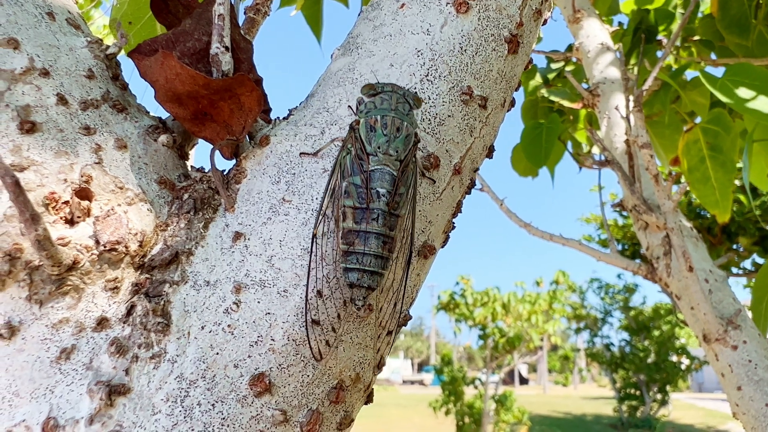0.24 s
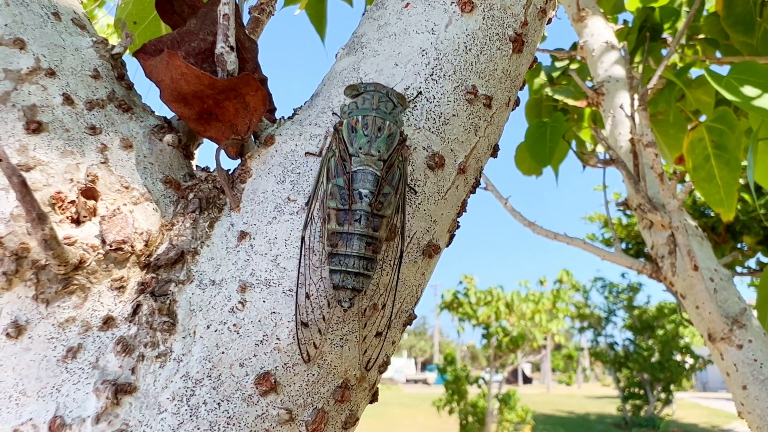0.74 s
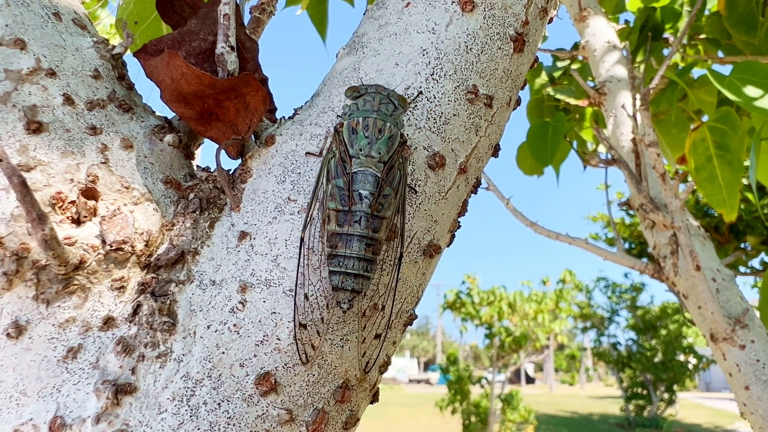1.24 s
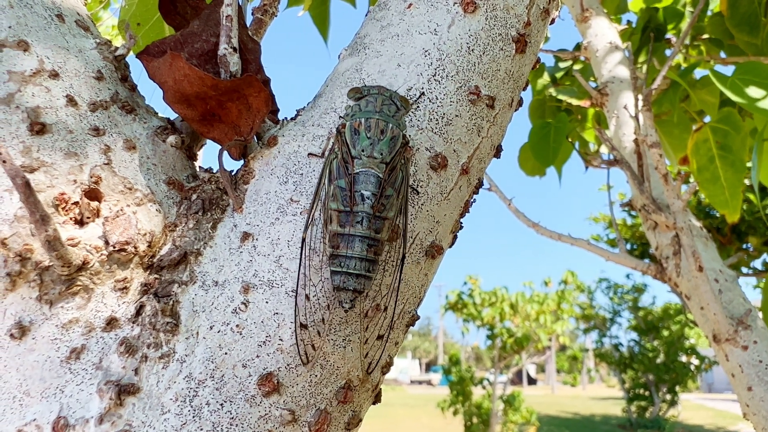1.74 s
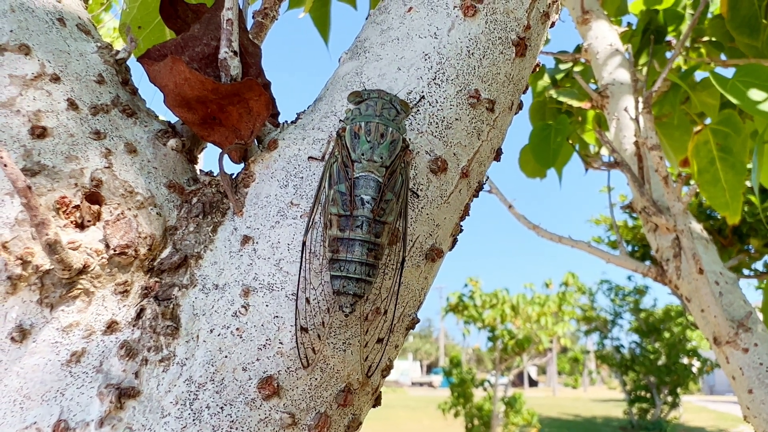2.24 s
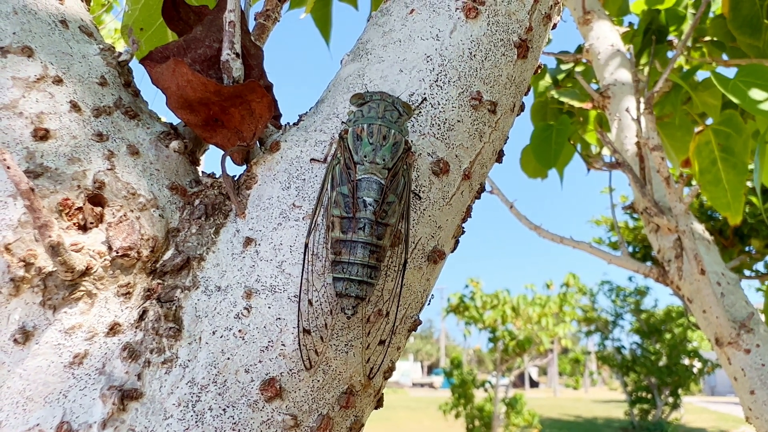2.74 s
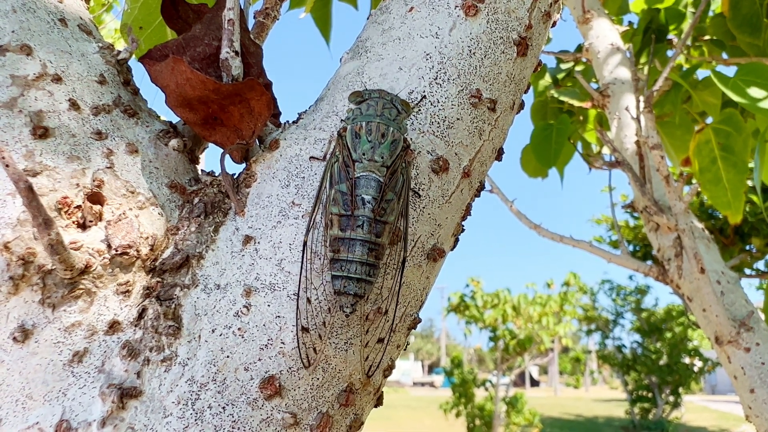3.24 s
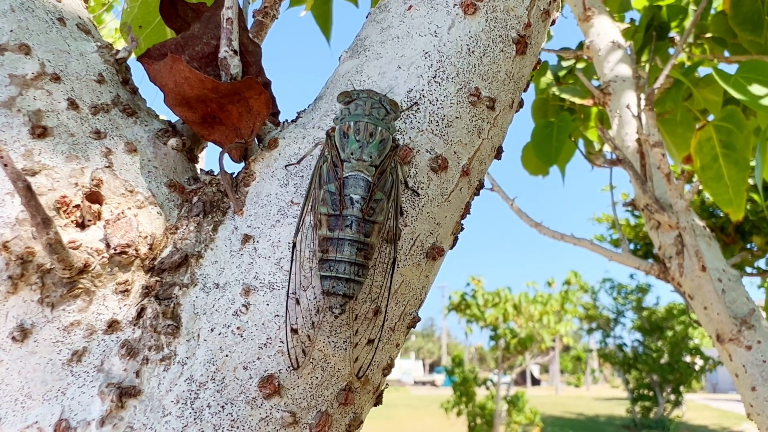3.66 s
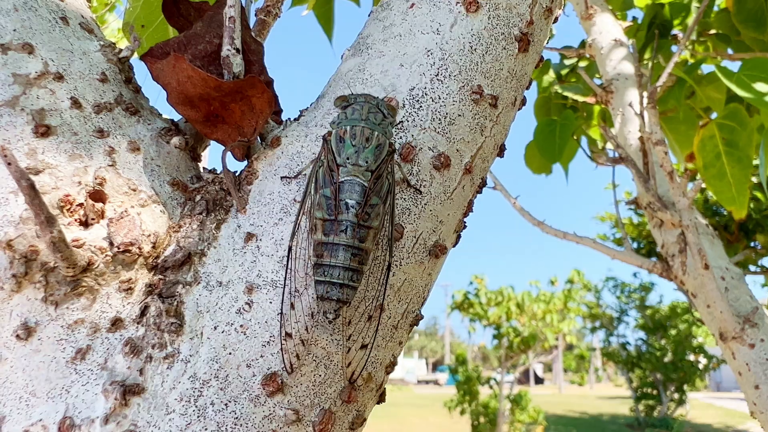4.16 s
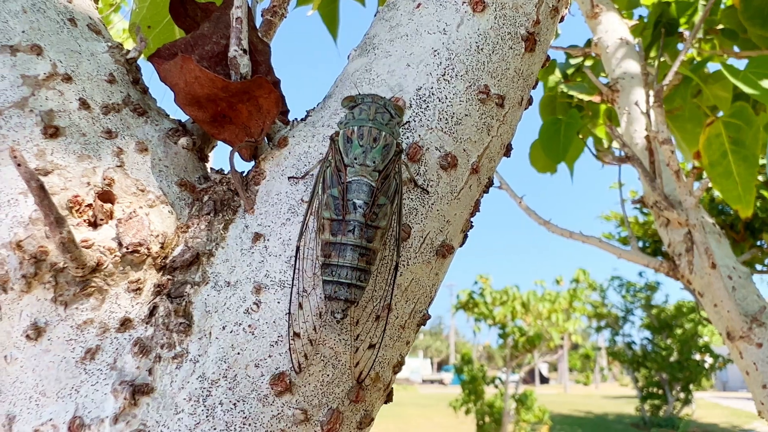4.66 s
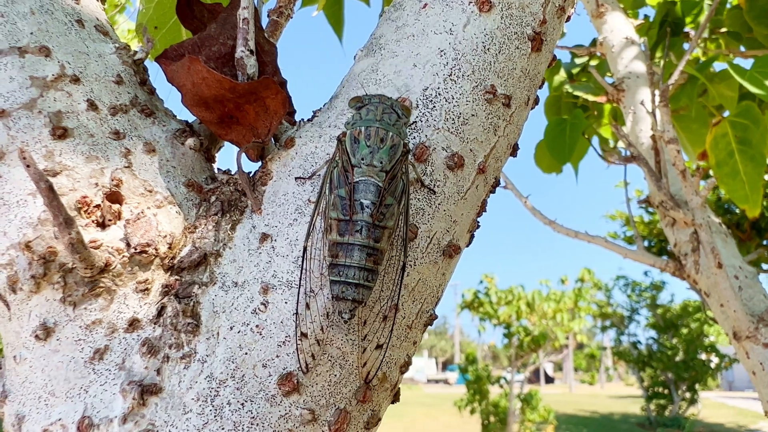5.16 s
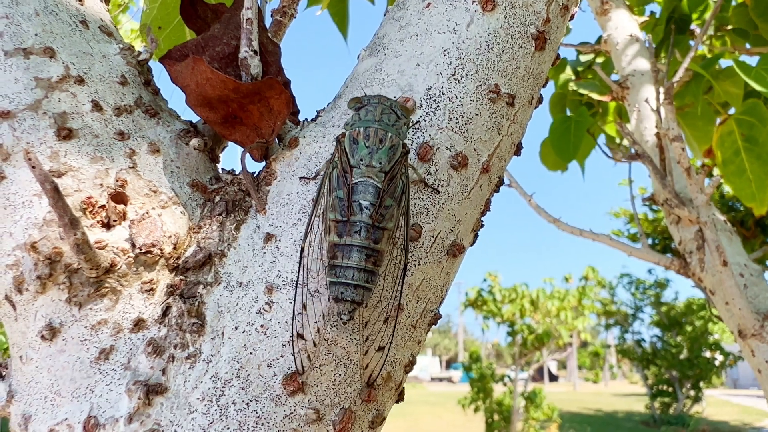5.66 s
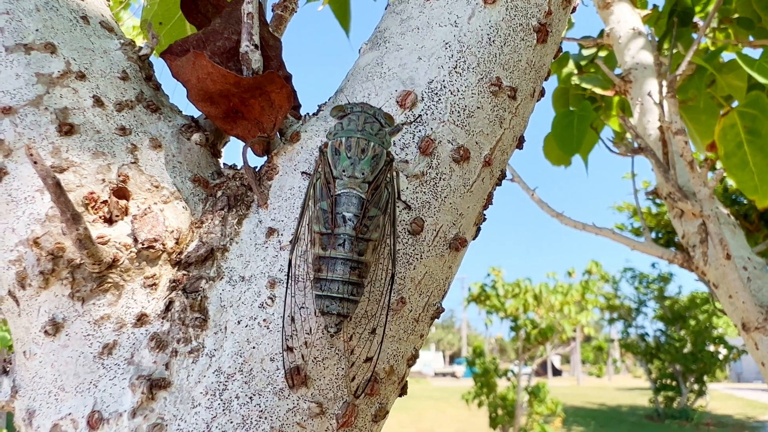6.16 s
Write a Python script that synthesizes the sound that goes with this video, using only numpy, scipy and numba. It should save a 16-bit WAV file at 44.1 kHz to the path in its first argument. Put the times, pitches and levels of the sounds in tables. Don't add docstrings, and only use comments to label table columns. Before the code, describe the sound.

A single cicada close by sings a loud, harsh, high rattling buzz in phrases, each ending in a swell and brief gap, in a quiet park.

```python
import sys
import numpy as np
from scipy import signal
from scipy.io import wavfile
from numba import njit

SR = 44100
rng = np.random.default_rng(int(sys.argv[2]) if len(sys.argv) > 2 else 0)


def ratio_of_db(decibels):
    return 10 ** (np.asarray(decibels, float) / 20)


def dump_mix(stems):
    frames = np.atleast_2d(stems).T
    limited = np.clip(frames, -1, 1)
    pcm = np.round(limited * 32767).astype(np.int16)
    wavfile.write(sys.argv[1], SR, pcm)


N = 283122


def rms_one(x):
    return x / np.sqrt(np.mean(x ** 2) + 1e-20)


@njit
def ring(x, r, turn):
    out = np.zeros(len(x))
    for i in range(2, len(x)):
        drive = (1 - r * r) / 2 * (x[i] - x[i - 2])
        out[i] = drive + 2 * r * np.cos(turn[i]) * out[i - 1] - r * r * out[i - 2]
    return out


def resonate(x, modes, tune=1):
    turn = 2 * np.pi / SR * tune * np.ones(N)
    x = x + np.cos(np.arange(N)) / 10 ** 12
    out = 0
    for k, (hz, width_hz, level_db) in enumerate(modes):
        out = out + (-1) ** k * ratio_of_db(level_db) * ring(x, np.exp(-np.pi * width_hz / SR), hz * turn)
    return rms_one(out)


# hz, db_per_hz
RUMBLE_SPECTRUM = [(20, -18), (60, -9.5), (120, -13.5), (250, -19), (450, -21.5), (700, -19), (1100, -26),
                   (1600, -52)]
# centre_s, half_width_s, level_db
RUMBLE_SWELLS = [
    (.3, 0.39, 3.5),
    (1.55, 0.11, 6),
    (2.048, 0.32, 7),
    (3.8, .3, 1.5),
    (6.05, .45, 6),
]
# hz, width_hz, level_db
CHORUS = [(1910, 910, -6), (3400, 1600, -5), (4190, 67, 6), (4800, 450, -3.5), (5100, 380, -9),
          (5600, 500, -1), (7300, 1100, -13)]


def park(rumble_db=-80, chorus_db=-65):
    rumble, edges_hz = 0, 22 * 2 ** np.arange(0, 6.6, .5)
    white = rng.standard_normal((3, N))
    hz, db = np.transpose(RUMBLE_SPECTRUM)
    for k, (low, high) in enumerate(zip(edges_hz, edges_hz[1:])):
        band = signal.sosfilt(signal.butter(2, [low, high], "band", fs=SR, output="sos"), white[k % 2])
        swell = np.interp(np.arange(N), np.linspace(0, N, 16), rng.standard_normal(16))
        band_db = np.interp(np.log(low * high) / 2, np.log(hz), db)
        rumble = rumble + band * ratio_of_db(band_db + 1.4 * swell)
    t = np.arange(N) / SR
    swell_db = sum(db * np.exp(-((t - s) / half_s) ** 2) for s, half_s, db in RUMBLE_SWELLS)
    chorus = resonate(resonate(white[2], CHORUS), CHORUS)
    return ratio_of_db(rumble_db + swell_db) * rms_one(rumble) + ratio_of_db(chorus_db) * chorus


def echoes(x, t60_s, level_db, top_hz):
    t = np.arange(int(.6 * SR)) / SR
    response = rng.standard_normal(len(t)) * ratio_of_db(-60 * t / t60_s) * (t > .002)
    response = signal.sosfilt(signal.butter(1, top_hz, fs=SR, output="sos"), response)
    response = response / np.sqrt(np.sum(response ** 2))
    return ratio_of_db(level_db) * signal.fftconvolve(x, response)[:N]


# first_stroke_s, last_stroke_s
PHRASES = [
    (-2.318, 1.689),
    (1.8265, 5.8339),
    (5.9638, 9.97),
]


def age(s):
    first = np.array(PHRASES)[:, 0]
    return s - first[np.maximum(np.searchsorted(first, s, side="right") - 1, 0)]


# after_start_s, force_db, posture, membrane_hz
OPENING = [
    (0, -51, -0.3, 5130),
    (.023, -41.5, -1.3, 5050),
    (.045, -40, -2, 5020),
    (0.076, -36, -0.28, 5110),
    (.13, -34.5, -0.072, 5240),
    (.22, -33, 0.069, 5254),
    (.5, -34, .05, 5260),
    (.6, -30, 0.38, 5480),
    (.68, -33.5, 0.1, 5253),
]
# before_end_s, force_db, posture, membrane_hz
CLOSING = [
    (0.49, -39, -0.22, 5120),
    (.33, -41.5, -0.64, 5000),
    (0.27, -40, 0.16, 5000),
    (0.241, -33, 0.74, 4950),
    (0.193, -28.5, 0.81, 5000),
    (0.18, -28.5, 0.85, 4940),
    (0.038, -28, 0.845, 4950),
    (.022, -30, 0.77, 5900),
    (0, -35.5, .6, 4920),
]
# level_db, slackens_before_end_s
MANNER = [(-0.5, 0.99), (-0.5, 0.64), (0, .7)]


def effort(steady_db=-36, steady_hz=5283):
    rows = []
    for (first, last), (level_db, slacken_s) in zip(PHRASES, MANNER):
        rows += [(first + s, force_db + level_db, *rest) for s, force_db, *rest in OPENING]
        rows += [(last - slacken_s, steady_db + level_db, 0, steady_hz)]
        rows += [(last - s, *rest) for s, *rest in CLOSING]
    at_s, *columns = np.transpose(rows)
    return [np.interp(np.arange(N) / SR, at_s, c) for c in columns]


# start_s, pairs
PAIRS = [(.0017, 20), (.3473, 35), (.9304, 17), (1.2038, 9), (1.338, 4), (1.387, 0), (1.3962, 2),
         (1.4106, 0), (2.4453, 9), (2.6059, 5), (2.6971, 3), (2.7483, 0), (3.3976, 10), (3.5764, 16),
         (3.8489, 17), (4.1321, 11), (4.319, 40), (5.0198, 15), (5.2709, 12), (5.4515, 5), (5.5172, 3),
         (5.5447, 0)]
# start_s, pairs
STUMBLES = [(2.7483, 2), (2.7777, 2), (2.8204, 2), (2.848, 2), (2.8754, 3), (2.9156, 2), (2.9596, 2),
            (2.9877, 2), (3.0326, 2), (3.1032, 2), (3.1495, 2), (3.2817, 2), (3.3657, 2), (3.3976, 0)]


def pairs(bunched_s=.0102, rest_s=.0085, single_s=.0165):
    spans = [(s, end, many) for (s, many), (end, _) in zip(PAIRS, PAIRS[1:])]
    for (s, many), (end, _) in zip(STUMBLES, STUMBLES[1:]):
        bunch_end = s + many * bunched_s
        free = bunch_end + rest_s
        spans += [(s, bunch_end, many), (free, end, round((end - free) / single_s))]
    spans = [span for span in spans if span[2] > 0]
    start = [np.linspace(s, end, many, endpoint=False) for s, end, many in spans]
    room_s = [np.full(many, (end - s) / many) for s, end, many in spans]
    return np.concatenate(start), np.concatenate(room_s)


# start_s, strokes, pair_ms, first_to_second_tymbal_ms
RUNS = [(1.4106, 24, 7.94, 3.7), (1.5059, 12, 7.9, 3.2), (1.5533, 22, 8.016, 2.97), (1.6415, 8, 8.0, 3.9),
        (1.8328, 52, 7.75, 3.9), (2.3142, 31, 7.95, 4.0), (5.5447, 21, 8.03, 3.5), (5.629, 16, 8.01, 3.4),
        (5.6931, 22, 7.99, 2.97), (5.781, 7, 8.0, 3.9), (5.971, 54, 7.98, 3.9)]
STRAYS = [1.387, 1.6785, 5.8127, 5.822]
# start_s, bursts, first_gap_ms
BURSTS = [
    (2.0424, 8, 32.0),
    (6.1944, 7, 31.4),
]
# phrase_age_s, lag_ms
LAG = [(.62, 3.2), (.8, 3.9), (.9, 4.7), (2.85, 8.0), (3.2, 8.2)]


def strokes(burst_slows_ms=.24, stroke_share=.12):
    phrase_ends = [end for row in PHRASES for end in row]
    runs = RUNS + [(s, 1, 0, 0) for s in STRAYS + phrase_ends if 0 < s < N / SR]
    for s, many, ms in BURSTS:
        for k in range(many):
            gap_ms = stroke_share * (ms + 2 * burst_slows_ms * k)
            burst_s = s + (ms - burst_slows_ms + burst_slows_ms * k) * k / 1000
            runs.append((burst_s, 6, 2 * gap_ms, gap_ms))
    first, room_s = pairs()
    lag_s = np.interp(age(first), *np.transpose(LAG)) / 1000
    start = [first, first + np.minimum(lag_s, room_s / 2)]
    side = [np.zeros(len(first), int), np.ones(len(first), int)]
    for s, many, pair_ms, lag_ms in runs:
        k = np.arange(many)
        start.append(s + (k // 2 * pair_ms + k % 2 * lag_ms) / 1000)
        side.append(k % 2)
    start, side = np.concatenate(start), np.concatenate(side)
    order = np.argsort(start)
    return start[order], side[order]


def train(times, sizes):
    at = np.clip(times.ravel() * SR, 0, N - 2)
    whole, part = at.astype(int), at % 1
    early = np.bincount(whole, sizes.ravel() * (1 - part), N)
    return early + np.bincount(whole + 1, sizes.ravel() * part, N)


RIB_DB = [-7, -1, 0, 0, 0, -1, -3]
SWELL_RIB_DB = [5, -4.5, 8, 5, -2.5, -38, -70]
TRAIL_DB = [-7, 2.5, 2.5]


def tymbals(start, side, rib_hz, membrane_hz, posture, wobble_s=24e-6, slack_s=.0003, crackle_s=3.9e-6):
    slow = np.diff(start, append=N / SR) > .0053
    lock = sum(np.exp(-((start[:, None] - last + .1) / .055) ** 4) for _, last in PHRASES)
    loose = 1 - .92 * lock
    start = start - .0003 + (slow + 0.181) * loose[:, 0] * slack_s * rng.standard_normal(len(start))
    at = (start * SR).astype(int)
    begin, rib_s = start[:, None], 1 / rib_hz[at, None]
    luck = rng.standard_normal((len(start), 4, 21))
    wobble = wobble_s * luck[:, 0]
    force = ratio_of_db(0.23 * luck[:, 3, :1] - 0.13 * side[:, None])

    rib = np.arange(len(RIB_DB))
    rib = rib + 0.383 + 0.01 * (rib - 3) ** 2 * np.sign(rib - 3)
    rib_size = force * ratio_of_db(np.array(RIB_DB) + .4 * luck[:, 1, :7])
    ribs = train(begin + rib * rib_s + wobble[:, :7], rib_size)
    boom_s = begin + (rib + 0.28 * side[:, None]) / 1830 + loose * wobble[:, :7]
    booms = train(boom_s, force * ratio_of_db(np.array(SWELL_RIB_DB)))

    step = np.arange(21) / 3 + 0.34 + 0.12 * rng.standard_normal(21)
    step = step + 0.032 * rng.standard_normal((2, 21))[side]
    size = np.tile([1, -ratio_of_db(6.5), ratio_of_db(11.5)], 7) * ratio_of_db(np.repeat(RIB_DB, 3))
    size = size * force * ratio_of_db(.5 * luck[:, 1])
    drift = loose * crackle_s * np.cumsum(luck[:, 2], axis=1) / 3
    when = begin + step * 2.83 / membrane_hz[at, None] + drift
    snaps = train(when, size)
    crackle = train(when, size * ratio_of_db(-.4 * step))

    reach = slow[:, None] * np.clip(-2.7 * posture[at, None], 0, 1)
    trail_s = begin + (rib[-1] + 1 + np.arange(3)) * rib_s + wobble[:, 7:10]
    trail = train(trail_s, force * ratio_of_db(np.array(TRAIL_DB)) * reach)
    return ribs + trail, booms, snaps + 0.83 * trail, crackle


def by_posture(rows, posture):
    at, *columns = np.transpose(rows)
    return [np.interp(posture, at, c) for c in columns]


# hz, width_hz, level_db
SAC = [(1850, 850, 47), (2250, 180, -8), (1450, 270, -20)]
SAC_OPEN = [(2128, 496, 7), (2350, 130, 9.5)]
OVERTONE = [(3333, 296, 16.6), (3960, 1060, 11.6), (4880, 380, 8.2)]
OVERTONE_OPEN = [(3220, 500, -2), (3432, 336, 5), (3775, 370, 2), (4047, 265, 3.5)]
MEMBRANE = [(5318, 74, 2.5), (5915, 176, -0.5)]
MEMBRANE_OPEN = [(4504, 77, -2.6), (5066, 420, 0.92)]
PLATES = [(7225, 250, -4.5), (7673, 36, -5), (7940, 230, -10.5), (8960, 480, -9), (10500, 380, -6.5),
          (11140, 1410, -6), (12410, 810, 0.5), (12813, 520, 2), (12660, 780, -16.5), (14400, 190, -24),
          (14730, 470, -13.5), (15600, 120, -17), (15570, 660, -6)]
PLATES_OPEN = [(7280, 490, -9), (8260, 770, -3.5), (10040, 840, -0.5), (9520, 400, -14), (12300, 810, -9.5),
               (13800, 770, -10), (15300, 1100, -11.5)]
# posture, overtone_db, membrane_db, plates_db
VOICING = [(-0.85, -35, 3, 7.5), (-1, -32, 6, 8.5), (0, -0.5, 5.5, 7.5), (0.37, .5, -7.5, 5.5),
           (0.715, 2, -10, -8.5), (0.883, 8, -2.5, -9.5)]
# posture, rib_click_hz, stretched_share (0-1)
TUNING = [(-0.84, 1830, 0.12), (0, 1881, 0.05), (0.29, 1950, 0.24), (0.82, 1960, 1), (0.74, 3100, 1)]


def cicada(tighten_per_s=0.0036, wake_db=-22, wake_s=0.046):
    start, side = strokes()
    force_db, posture, membrane_hz = effort()
    old_s = age(np.arange(N) / SR)
    rib_hz, stretch = by_posture(TUNING, posture)
    rib_hz = rib_hz * (1 + tighten_per_s * (old_s - 1))
    stretch = np.clip(stretch, 0, 1)
    ribs, booms, snaps, crackle = tymbals(start, side, rib_hz, membrane_hz, posture)

    overtone_db, membrane_db, plates_db = by_posture(VOICING, posture)
    asleep_db = wake_db * np.clip(1 - old_s / wake_s, 0, 1)
    sac_tune, plate_tune = rib_hz / 1870, membrane_hz / 5290
    hard_booms = booms + 0.32 * snaps
    parts = [(ribs, booms, SAC, SAC_OPEN, sac_tune, 0),
             (ribs, booms, OVERTONE, OVERTONE_OPEN, sac_tune, overtone_db),
             (snaps, hard_booms, MEMBRANE, MEMBRANE_OPEN, plate_tune, membrane_db + asleep_db),
             (crackle, hard_booms, PLATES, PLATES_OPEN, plate_tune, plates_db + asleep_db)]
    song = 0
    for clicks, swell_clicks, shut, wide, tune, level_db in parts:
        closed = np.sqrt(1 - stretch) * resonate(clicks, shut, tune)
        opened = np.sqrt(stretch) * resonate(swell_clicks, wide)
        song = song + ratio_of_db(level_db) * (closed + opened)

    song = signal.lfilter(*signal.iirnotch(9950, 7.0, SR), song)
    valley = signal.lfilter(*signal.iirpeak(2665, 10, SR), song)
    song = song - np.sqrt(stretch) * valley
    duty = np.sqrt(N / SR / len(start) / .004)
    small_body = signal.butter(5, 1330, "high", fs=SR, output="sos")
    return signal.sosfilt(small_body, ratio_of_db(force_db) * song / duty)


def scene():
    song = cicada()
    bark = echoes(song, t60_s=0.014, level_db=-14, top_hz=4250)
    trees = echoes(song, t60_s=0.25, level_db=-57, top_hz=4200)
    return np.array([song + bark + trees + park()] * 2)


def band_limit(x):
    return signal.sosfilt(signal.butter(12, 17140, fs=SR, output="sos"), x)


def record(dry, bend=0.02, cutoff_hz=15850):
    bent = dry + bend * dry ** 2
    bent = signal.sosfilt(signal.butter(1, 40, "high", fs=SR, output="sos"), bent)
    cut = signal.sosfilt(signal.cheby2(14, 19, cutoff_hz, fs=SR, output="sos"), bent)
    mix = signal.sosfilt(signal.cheby2(12, 40, 17100, fs=SR, output="sos"), cut)
    return band_limit(mix)


dry = scene()
out = record(dry)
dump_mix(out)
```